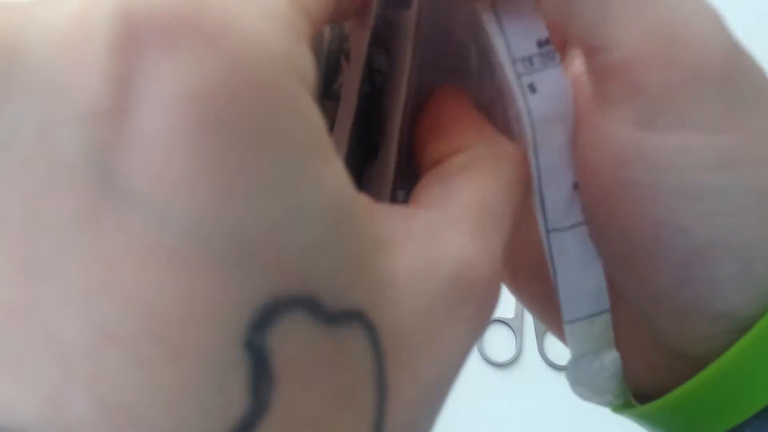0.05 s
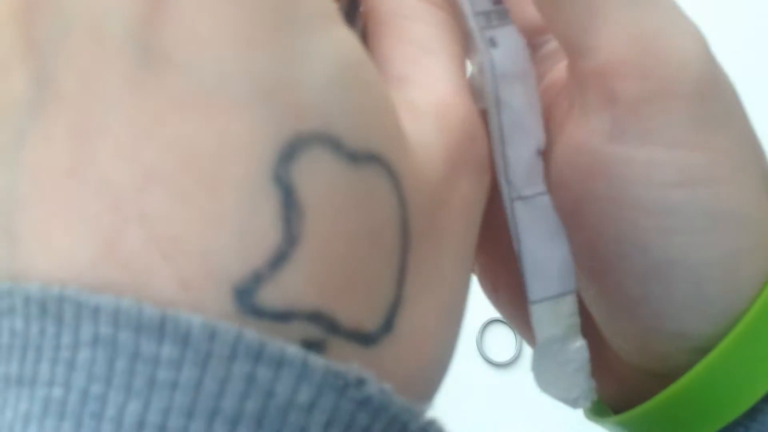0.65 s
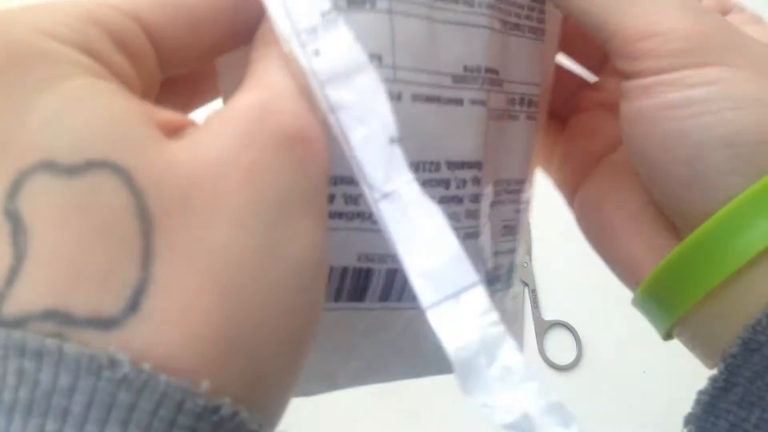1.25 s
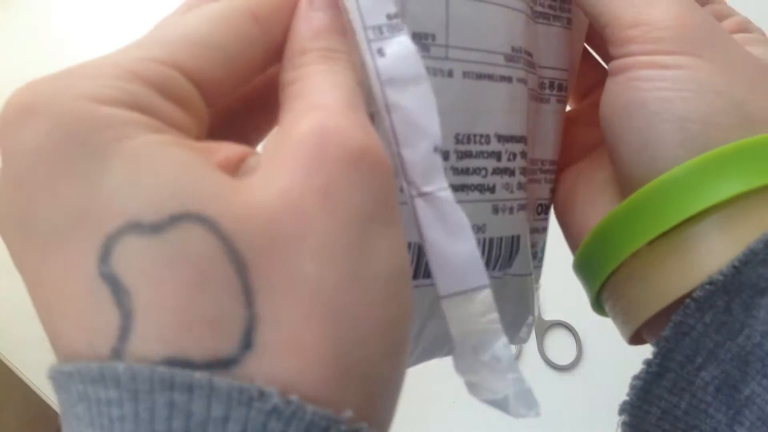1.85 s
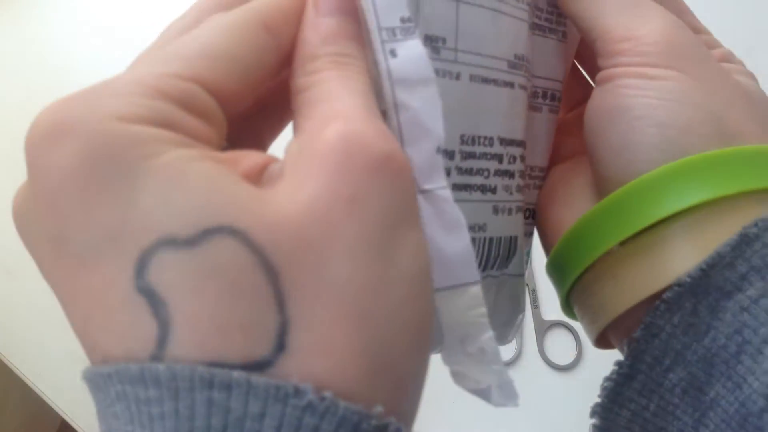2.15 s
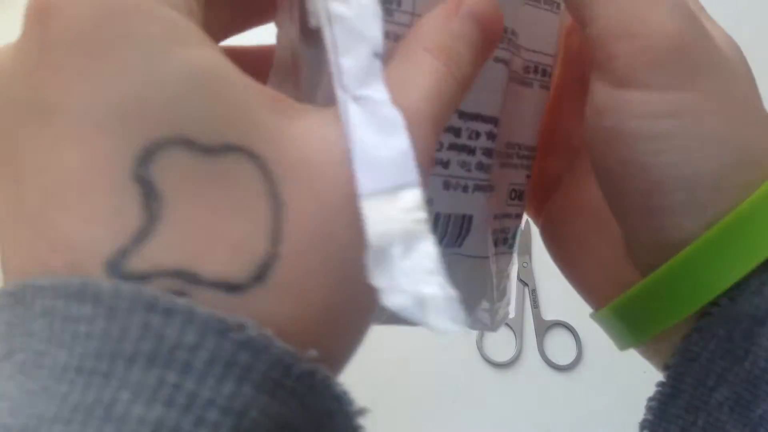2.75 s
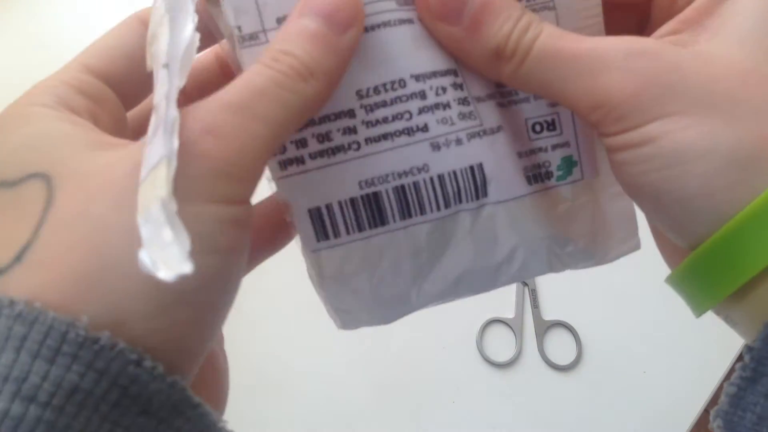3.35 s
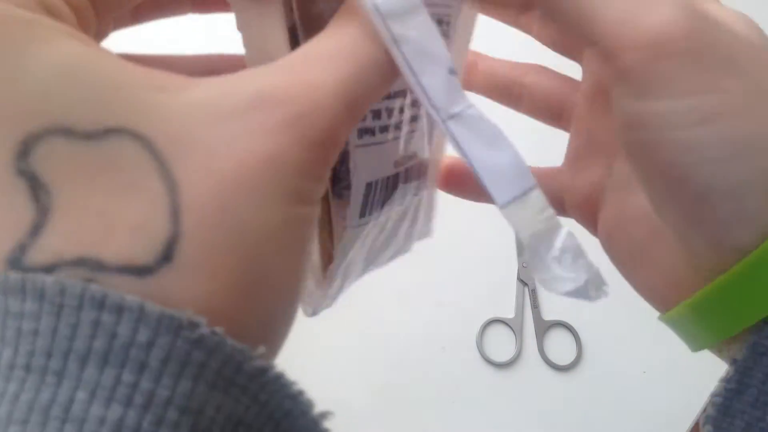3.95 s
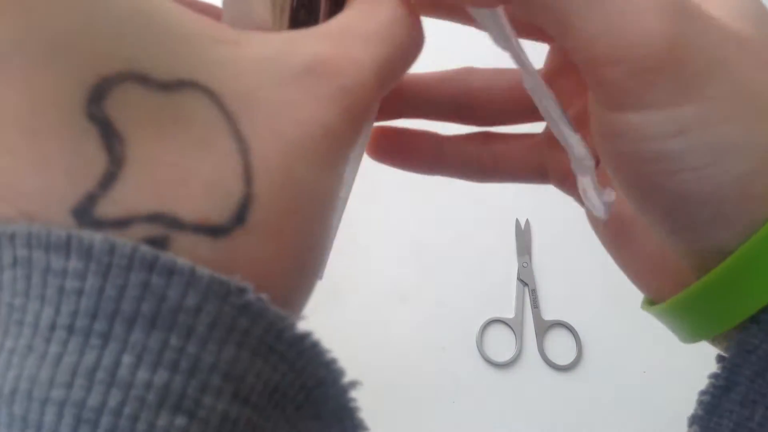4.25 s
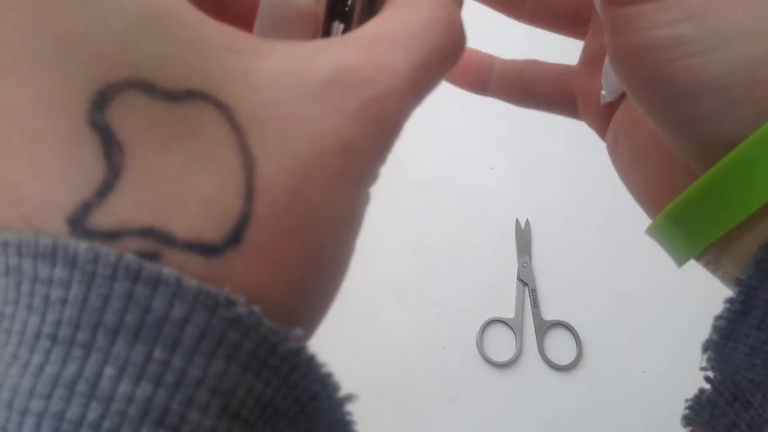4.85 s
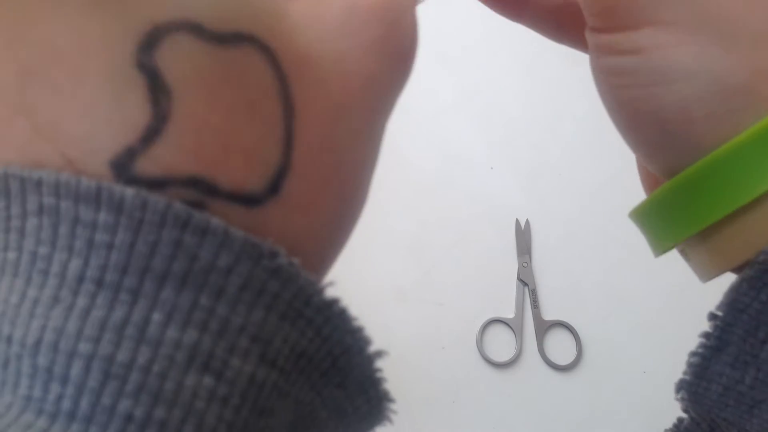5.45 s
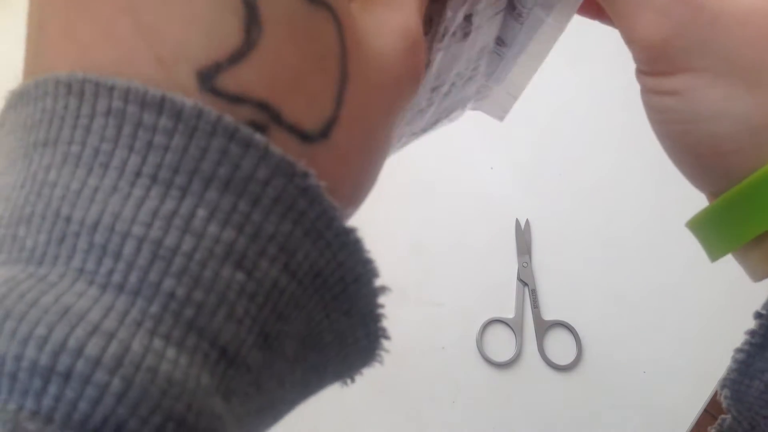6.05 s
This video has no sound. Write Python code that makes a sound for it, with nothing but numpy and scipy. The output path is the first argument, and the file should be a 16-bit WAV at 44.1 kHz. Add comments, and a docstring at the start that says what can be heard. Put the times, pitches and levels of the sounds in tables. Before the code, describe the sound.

A thin plastic mailer bag crinkles close to the microphone for about six seconds as hands work it open. Bright, crisp crackles come right at the start, with more sharp snaps around 0.6 and 0.9 seconds and a fuller cluster from 1.1 to 1.4 seconds. Between squeezes, fingers slide over the plastic with a light hiss and tiny ticks. The loudest crumple comes from about 2.4 to 2.8 seconds, lower and slightly hollow, with soft, dull finger bumps on the bag. Separate sharp crinkles follow near 3.0, 3.3, 3.8 and 4.1 seconds, and a snap with a small bump at 4.6. The handling then turns lighter and sparser, with a few crackles around 5.3 seconds, a brief lull near 5.7 and a last crinkle at 6 seconds. The room is small and quiet, with hardly any echo.

```python
"""A metallised plastic mailer bag crinkles as two hands work it open, close by, above a table.
Fingers slide over the film and crumple it in short squeezes: friction hisses, swarms of tiny creases
buckle, and large ones snap through sharply. Fingertips bump the bag, and once stick-slip makes a squeak.
The half-open pouch colours it all with a few hollow resonances. The room is small and quiet."""
import sys
import numpy as np
from scipy import signal
from scipy.fft import rfft, irfft
from scipy.io import wavfile
from scipy.ndimage import uniform_filter1d

SR = 44100
rng = np.random.default_rng(int(sys.argv[2]) if len(sys.argv) > 2 else 0)


def dump(signal):
    """Clip the signal to [-1, 1] and save it as 16-bit WAV at the path in sys.argv[1]."""
    limited = np.clip(np.atleast_2d(signal).T, -1, 1)
    pcm = np.round(limited * 32767).astype(np.int16)
    wavfile.write(sys.argv[1], SR, pcm)


N = 268569
TIME = np.arange(N) / SR
STEP_TIMES = np.arange(0, TIME[-1], .002)   # coarse time grid of the hand movements
CUTOFF_HZ = 15450

# squeezes; tight folds sound bright, broad panels dull:
# (time [s], hold [s], relative level [dB], brightness [dB])
SQUEEZE_STROKES = [(0.084, 0.021, -44, 12.5), (0.122, 0.047, -48.5, 10.5), (0.216, 0.031, -44.0, 15.0),
                   (0.321, 0.134, -56.5, 10.5), (0.636, 0.053, -41.0, 9.5), (0.752, 0.06, -58.0, -8.5),
                   (0.938, 0.16, -49.5, 1.0), (1.082, 0.074, -46.5, -11.5), (1.277, 0.009, -44.5, -7.0),
                   (1.303, 0.012, -42.0, -20.0), (1.416, 0.084, -56.5, -4.0), (1.809, 0.013, -52, -10),
                   (2.023, 0.03, -54.0, 6), (2.319, 0.067, -56.5, -0.0), (2.387, 0.033, -44.0, -6.0),
                   (2.427, 0.088, -48.5, 1.5), (2.515, 0.06, -45.0, 3.0), (2.574, 0.038, -35.5, -7.0),
                   (2.621, 0.026, -47.5, -14.0), (2.666, 0.04, -44.0, -17.0), (2.735, 0.059, -55.0, -9.0),
                   (2.784, 0.027, -46.5, -8.5), (2.908, 0.12, -57.0, -14.5), (3.014, 0.02, -43.5, -2.5),
                   (3.126, 0.016, -49, -3.0), (3.194, 0.04, -48.0, -0.0), (3.277, 0.031, -47.0, -7.0),
                   (3.384, 0.022, -47.5, -12), (3.648, 0.04, -51.5, 12.5), (3.737, 0.064, -48.0, -6.0),
                   (3.8, 0.055, -47.5, -7.5), (3.964, 0.041, -48.5, -7), (4.106, 0.014, -42.5, -3.5),
                   (4.16, 0.084, -51.5, -2.5), (4.244, 0.05, -44.5, -3.5), (4.371, 0.012, -49.5, 3.5),
                   (4.599, 0.022, -54.5, 3), (4.634, 0.043, -42.0, -1.0), (4.753, 0.026, -51.0, -3.5),
                   (4.835, 0.012, -58.5, -13.5), (4.898, 0.015, -54.5, -1), (5.038, 0.067, -54.5, 9.5),
                   (5.107, 0.011, -51.5, -2), (5.262, 0.014, -46.5, 13.5), (5.377, 0.053, -51.0, -3.5),
                   (5.588, 0.042, -58.0, -4), (5.701, 0.01, -57.5, -7), (5.923, 0.056, -51.5, 3.5),
                   (6.016, 0.033, -54.5, -7)]
# fingers sliding over the film: (time [s], relative level [dB])
SLIDING_LEVELS = [(0.0, -57.5), (0.4, -58.0), (0.62, -61), (0.69, -55.5), (1.51, -54.5), (2.05, -56.5),
                  (2.19, -63), (2.87, -65.0), (3.0, -54.5), (3.51, -55.5), (3.91, -56), (4.44, -58.5),
                  (4.54, -72), (4.75, -60.5), (5.23, -59.5), (5.66, -79.0), (5.79, -61), (6.06, -57)]
# dull rubs as the whole bag shifts: (time [s], hold [s], relative level [dB])
BAG_SHIFTS = [(1.09, .02, -55), (2.571, .04, -43.5), (2.647, 0.039, -47.5), (2.89, 0.086, -55.5),
              (3.838, 0.045, -66), (3.919, 0.13, -49), (4.095, .03, -58)]
# bands of the four motions, namely whole bag, broad panels, creases, fine foil: (low [Hz], high [Hz])
MOTION_BANDS = [(60, 500), (850, 2600), (3000, 7000), (8000, 15500)]
# response of each motion: (sliding gain [dB], squeezing gain [dB], gain per brightness [dB/dB])
MOTION_GAINS = [(-16, -14.5, 0.02), (-4.5, -6, -0.91), (-0.83, -0.32, -0.08), (-6, -5.5, 0.4065)]
# colour of the rustling film: (frequency [Hz], gain [dB])
FILM_SPECTRUM = [(35, -21), (70, -12), (160, -1), (300, 2), (550, -3), (900, -1.5), (1800, 3), (2700, 3.5),
                 (4300, 3.5), (6500, 4.5), (9000, 3), (15000, -1)]
# large creases snapping through: (time [s], relative level over 1 ms [dB], frequency [Hz], Q [1])
LARGE_CREASES = [(0.045, -40.5, 8140, 1.2), (0.0935, -30.5, 6450, 1.1), (0.135, -31, 4850, 0.27),
                 (0.1463, -30, 6700, 1.1), (0.1584, -20, 11900, 0.82), (0.1745, -27.5, 8600, 1.3),
                 (0.2096, -32, 9200, 0.63), (0.221, -21, 5020, 7.6), (0.2253, -36, 990, 1.3),
                 (0.2354, -27.5, 6900, 5.1), (0.2485, -27.5, 5700, 5.1), (0.265, -31, 5550, 2),
                 (0.4047, -34.5, 9800, 0.17), (0.4635, -31.5, 9600, 1.8), (0.6494, -22.5, 4840, 3.9),
                 (0.6746, -26, 6000, 1.9), (0.6922, -32, 6860, 7.4), (0.739, -42.5, 880, 1.4),
                 (0.7606, -40.5, 1173, 1.8), (0.8063, -32, 3080, 0.22), (0.9439, -20, 7200, 1.5),
                 (1.1049, -26, 1680, 0.42), (1.137, -27.5, 6280, 1.5), (1.1528, -32.5, 4366, 2.07),
                 (1.1587, -31, 958, 1.1), (1.2362, -36.5, 5070, 5.4), (1.2663, -30.5, 6860, 1),
                 (1.2785, -25, 3200, 0.29), (1.2993, -22, 4880, .35), (1.31, -25, 1070, 1.2),
                 (1.3911, -29, 5400, 7.1), (1.4244, -32.5, 2010, 1.1), (1.4409, -32, 7600, .6),
                 (1.4665, -38, 4140, 1.4), (1.5684, -38, 4580, 1.3), (1.6348, -40, 4970, .7),
                 (1.7046, -32.5, 4230, 3.4), (1.817, -35.5, 3100, 0.83), (1.8262, -38, 1010, 4.2),
                 (1.857, -35.5, 10300, 4), (1.8917, -36.5, 4630, 3.6), (1.9077, -31.5, 7350, 3.9),
                 (1.9833, -39, 4250, 4.5), (2.0341, -28.5, 7000, 2.4), (2.0558, -34, 4170, 10),
                 (2.2467, -36.5, 3970, 4.4), (2.3444, -36, 6650, 4.8), (2.3586, -37, 6300, 2),
                 (2.406, -25.5, 1840, 1.9), (2.4198, -32.5, 5440, 3.1), (2.5274, -28, 5300, 1.5),
                 (2.5493, -25.5, 8650, 1.8), (2.5884, -20, 1310, 0.24), (2.5982, -19, 11600, 4.2),
                 (2.6087, -24.5, 1910, 10), (2.6584, -25, 920, 2), (2.6729, -33, 1670, 2.9),
                 (2.693, -33, 2040, 2.8), (2.7076, -25.5, 2450, 4.3), (2.7913, -26, 3740, 5),
                 (2.8204, -28, 7500, 3.5), (2.9725, -36.5, 6300, 0.22), (3.0225, -20.5, 5070, 1.8),
                 (3.145, -31.5, 4180, 0.78), (3.2193, -31, 1390, 0.62), (3.2552, -37.5, 1270, 2.8),
                 (3.285, -22, 4600, 1.4), (3.3091, -30, 3940, 2.4), (3.3554, -31, 2280, .9),
                 (3.4531, -37, 3280, 6), (3.4625, -36, 1210, 0.35), (3.606, -37.5, 1420, 2.2),
                 (3.6679, -34, 4370, 6), (3.6822, -36, 4880, 4.6), (3.7475, -31, 1280, 0.46),
                 (3.8093, -23.5, 1750, 1.4), (3.854, -34.5, 1210, 0.41), (3.9421, -36, 1430, 2.3),
                 (3.9748, -35, 2760, 2.5), (4.1161, -20.5, 3145, 1.8), (4.1518, -31.5, 5200, .9),
                 (4.1724, -39, 1390, 2.4), (4.2058, -37.5, 1290, 6.3), (4.222, -34, 12700, 2.4),
                 (4.2542, -33.5, 950, 0.51), (4.261, -28.5, 4040, 0.21), (4.3836, -33, 4580, 1.5),
                 (4.4472, -39, 4730, 3), (4.5095, -39.5, 5540, 1.8), (4.6408, -26.5, 4190, 22),
                 (4.6414, -29.5, 880, 2.1), (4.679, -27, 9300, 4.7), (4.8447, -40.5, 1110, .8),
                 (4.908, -35.5, 2450, 2.2), (4.916, -38, 3760, 0.89), (5.1122, -36.5, 4930, 7),
                 (5.117, -41, 1080, 2.1), (5.1618, -39, 5270, 0.8), (5.2733, -27, 8000, 1.7),
                 (5.382, -39, 1590, 3.2), (5.3911, -27, 3600, 0.27), (5.427, -38, 5650, 0.97),
                 (5.59, -50.5, 1000, 1.1), (5.614, -38, 4880, 0.42), (5.9467, -33, 5030, 1.7),
                 (6.027, -24, 5340, 2.8), (6.0848, -31, 1100, 0.86)]
# fingers knocking the bag and its contents: (time [s], relative peak level [dB], frequency [Hz])
FINGER_BUMPS = [(0.225, -51, 280), (0.24, -56, 180), (0.324, -58, 178), (0.629, -51.5, 182),
                (0.763, -52, 270), (1.105, -48, 184), (1.276, -54, 290), (2.398, -46.5, 254),
                (2.586, -34.5, 325), (2.589, -55, 60), (2.606, -37.5, 310), (2.658, -41, 300),
                (2.708, -47.5, 340), (3.849, -48, 225), (4.0, -45, 287), (4.206, -51, 187),
                (4.251, -51, 188), (4.641, -40.5, 272)]
# a finger sticking and slipping: (centre time [s], duration [s], frequency [Hz], level [dB])
FINGER_SQUEAKS = [(3.405, 0.026, 5100, -41)]
# hollow resonances of the pouch: (frequency [Hz], bandwidth [Hz], relative gain [dB])
POUCH_MODES = [(215, 16, -21), (283, 28, -9.5), (388, 55, -15), (710, 27, -3), (965, 270, -3),
               (1370, 14, -34), (1525, 145, -7.5), (1744, 81, -16), (2050, 160, -5), (4110, 1340, -11.5)]
# early reflections off the walls: (delay [s], gain [dB])
WALL_ECHOES = [(0.0324, -35), (0.0364, -32)]
# faint low room drone and microphone hiss: (frequency [Hz], relative spectral density [dB])
BACKGROUND_SPECTRUM = [(30, -8), (70, 2), (150, 4), (280, 2), (375, 6), (490, -3.5), (570, 6), (650, -3.5),
                       (2000, -8.5), (5000, -4.5), (10000, -7.5), (15000, -9)]


def rustle(motions, base_per_s, clump_db, spread_db, db_per_octave, slide_db, treble_slide_db, level_db):
    """Buckling impulses superpose on friction noise; harder handling makes more creases give way."""
    levels = np.array([np.interp(TIME, STEP_TIMES, db) for db in motions])
    effort = rms_one(from_db(levels[2] / 2))   # follows the motion of the creases
    clumps = from_db(clump_db * drift(70))
    swarm = even_out(buckles(base_per_s * effort * clumps, spread_db) * clumps, span_s=0.079)
    onsets = np.flatnonzero(swarm)
    pitches = np.geomspace(500, 14000, len(onsets))[rng.permutation(len(onsets))]
    density_db = levels - 10 * np.log10(np.diff(MOTION_BANDS))
    log_centres = np.log(MOTION_BANDS).mean(axis=1)
    edges = np.geomspace(35, 16500, 19)
    out = np.zeros(N)
    for low, high in zip(edges, edges[1:]):
        hz = np.sqrt(low * high)
        grains = swarm.copy()
        # each crease is loudest at its own pitch
        grains[onsets] *= from_db(-db_per_octave * np.abs(np.log2(hz / pitches)))
        friction_gain = from_db(at_hz([(1000, slide_db), (10000, treble_slide_db)], hz))
        friction = friction_gain * rng.standard_normal(N) * rms_one(clumps)
        bandpass = signal.butter(2, [low, high], "band", fs=SR, output="sos")
        band = even_out(signal.sosfilt(bandpass, rms_one(grains) + friction), span_s=0.9)
        blend = np.array([np.interp(np.log(hz), log_centres, row) for row in np.eye(len(MOTION_BANDS))])
        out += band * np.sqrt(high - low) * from_db(blend @ density_db + at_hz(FILM_SPECTRUM, hz))
    return from_db(level_db) * out


def buckles(per_s, spread_db):
    """Tiny creases buckle as a Poisson process, with many small impulses and a few large ones."""
    sizes = from_db(spread_db * np.minimum(rng.exponential(1, N), 4))
    return (rng.random(N) < per_s / SR) * sizes * rng.choice([-1, 1], N)


def handling():
    """Incoherent sources add in power: sliding, squeezes and shifts give each motion its level in dB."""
    sliding_db, squeezing_db, tilt = np.transpose(MOTION_GAINS)[:, :, None]
    waver_db = 2 * np.interp(STEP_TIMES, TIME, drift(12))   # the fingers catch and let go
    power = from_db(np.interp(STEP_TIMES, *np.transpose(SLIDING_LEVELS)) + waver_db + sliding_db) ** 2
    for start, hold, db, brightness in SQUEEZE_STROKES:
        power += (stroke(start, hold) * from_db(db + squeezing_db + tilt * brightness)) ** 2
    for start, hold, db in BAG_SHIFTS:
        power[0] += (stroke(start, hold) * from_db(db)) ** 2
    return 10 * np.log10(power)


def stroke(start, hold, attack_s=0.008, release_db_per_s=369.5):
    """The envelope of one hand movement rises linearly, holds, then decays exponentially."""
    age = np.maximum(STEP_TIMES - start, 0)
    return np.minimum(age / attack_s, 1) * from_db(-release_db_per_s * np.maximum(age - hold, 0))


def snaps(creases, settle_db, settle_s, level_db=0):
    """Snap-through: a crease flips in one jolt and rings briefly while the film around it settles."""
    t = np.arange(int(.02 * SR)) / SR
    out = np.zeros(N + len(t))
    for time, db, hz, q in creases:
        settling = rng.standard_normal(len(t)) * np.exp(-t / settle_s)
        push = from_db(settle_db) * settling / np.linalg.norm(settling)
        push[0] += rng.choice([-1, 1])
        # a small facet radiates little below its own pitch
        ring = signal.lfilter(*signal.butter(2, hz * 0.22, "high", fs=SR), resonate(push, hz, q))
        ring *= np.sqrt(SR / 1000) / np.linalg.norm(ring)   # the energy of 1 ms at rms 1
        start = int(time * SR)
        out[start:start + len(t)] += from_db(db + level_db) * ring
    return out[:N]


def small_creases(motion_db, per_s, above_db, firm_db, spread_db, centre_hz, spread_octaves, q):
    """Stray creases buckle at random and stand out of the rustle; returns rows as in LARGE_CREASES."""
    count = len(STEP_TIMES)
    buckled = rng.random(count) < per_s * STEP_TIMES[1]
    size, pitch = rng.standard_normal((2, count))
    # under a firm grip they merge into the swarm and stand out less
    base_db = np.minimum(motion_db, (motion_db + firm_db) / 2)
    db = base_db + above_db + spread_db * np.clip(size, -2, 2)
    hz = np.clip(centre_hz * 2 ** (spread_octaves * pitch), 700, 13000)
    return np.column_stack([STEP_TIMES, db, hz, np.full(count, q)])[buckled]


def bumps(q, contact_s, level_db):
    """Soft impact: a fingertip gives a dull push to the limp bag, which is too damped to ring on."""
    t = np.arange(int(.06 * SR)) / SR
    out = np.zeros(N + len(t))
    for time, db, hz in FINGER_BUMPS:
        push = t * np.exp(-t / contact_s) * rng.choice([-1, 1])
        thud = resonate(resonate(push, hz, q), hz, q)
        start = int(time * SR)
        out[start:start + len(t)] += from_db(db + level_db) * thud / np.abs(thud).max()
    return out[:N]


def squeak(pitch_waver):
    """Stick-slip oscillation of a finger on the film gives a short, unsteady whistle."""
    out = np.zeros(N)
    for centre, duration, hz, db in FINGER_SQUEAKS:
        phase = 2 * np.pi * np.cumsum(hz * (1 + pitch_waver * drift(304))) / SR
        swell = np.cos(np.pi * np.clip((TIME - centre) / duration, -.5, .5))
        out += from_db(db) * np.sqrt(2) * np.sin(phase) * swell
    return out


def pouch(x, modes_db, dip_db, dip_hz):
    """The bag's air and panels resonate; the spectrum dips between the panel and crease pitches."""
    modes = sum(from_db(db) * resonate(x, hz, hz / width) for hz, width, db in POUCH_MODES)
    x = x + from_db(modes_db) * modes
    return x - (1 - from_db(dip_db)) * resonate(x, dip_hz, q=np.pi)


def room(x, t60_s, tail_db, wall_hz):
    """Wall reflections follow the direct sound as early echoes and a faint, short reverberant tail."""
    t = np.arange(SR // 2) / SR
    build_up = 1 - np.exp(-t / 0.0096)
    tail = rng.standard_normal(len(t)) * from_db(-60 * t / t60_s) * build_up
    tail = signal.sosfilt(signal.butter(1, wall_hz, fs=SR, output="sos"), tail)
    response = from_db(tail_db) * tail / np.linalg.norm(tail)
    response[0] += 1   # direct sound
    for delay, db in WALL_ECHOES:
        response[int(delay * SR)] += from_db(db)
    return signal.fftconvolve(x, response)[:N]


def background(level_db):
    """Stationary coloured noise gives the room's faint low drone and the microphone's hiss."""
    colour = from_db(at_hz(BACKGROUND_SPECTRUM, np.fft.rfftfreq(N, 1 / SR)))
    return from_db(level_db) * rms_one(irfft(rfft(rng.standard_normal(N)) * colour, N))


def resonate(x, hz, q):
    """A damped second-order resonator has unit gain at its peak and a bandwidth set by Q."""
    omega = 2 * np.pi * min(hz, CUTOFF_HZ) / SR
    loss = np.sin(omega) / (2 * q)
    return signal.lfilter([loss, 0, -loss], [1 + loss, -2 * np.cos(omega), 1 - loss], x + 1e-18)


def drift(corner_hz):
    """Low-pass filtered noise gives a random fluctuation of unit rms."""
    rolloff = 1 + (np.fft.rfftfreq(N, 1 / SR) / corner_hz) ** 2
    return rms_one(irfft(rfft(rng.standard_normal(N)) / rolloff, N))


def even_out(x, span_s):
    """Division by the running rms removes the slow envelope and leaves the fast grain."""
    width = int(span_s * SR / 2)
    power = uniform_filter1d(uniform_filter1d(x ** 2, width), width)
    return rms_one(x / np.sqrt(np.maximum(power, 0) + 1e-9))


def at_hz(spectrum, hz):
    """Levels are interpolated on a logarithmic frequency axis."""
    known_hz, db = np.transpose(spectrum)
    return np.interp(np.log(hz + 1e-9), np.log(known_hz), db)


def rms_one(x):
    """Division by the rms gives unit mean power."""
    return x / np.sqrt(np.mean(x ** 2) + 1e-20)


def from_db(db):
    """Amplitude grows tenfold for every 20 dB."""
    return 10 ** (np.asarray(db) / 20)


def scene():
    """Source and filter: the sounds of the film add, then pass through the pouch into the room."""
    motions = handling()
    _, panel_db, crease_db, _ = motions
    film = rustle(motions, base_per_s=1000, clump_db=2.5, spread_db=6.5, db_per_octave=10.5,
                  slide_db=-5, treble_slide_db=3, level_db=-2.5)
    film += snaps(LARGE_CREASES, settle_db=-5, settle_s=0.0017, level_db=-1.5)
    ticks = small_creases(crease_db, per_s=75, above_db=9.5, firm_db=-54, spread_db=3,
                          centre_hz=6000, spread_octaves=.6, q=3)
    pops = small_creases(panel_db, per_s=9, above_db=9.5, firm_db=-53, spread_db=2.5,
                         centre_hz=1550, spread_octaves=.4, q=1.3)
    film += snaps(ticks, settle_db=-10, settle_s=.001)
    film += snaps(pops, settle_db=-7, settle_s=.002)
    film += bumps(q=0.82, contact_s=0.00061, level_db=3)
    film += squeak(pitch_waver=.035)
    bag = pouch(film, modes_db=1, dip_db=-2.5, dip_hz=2630)
    return (room(bag, t60_s=0.13, tail_db=-17, wall_hz=6500) + background(level_db=-62.5))[None]


def record(dry):
    """Band limiting: a steep elliptic low-pass filter removes the highest treble."""
    return signal.sosfilt(signal.ellip(10, .1, 80, CUTOFF_HZ, fs=SR, output="sos"), dry)


dry = scene()
out = record(dry)
dump(out)
```